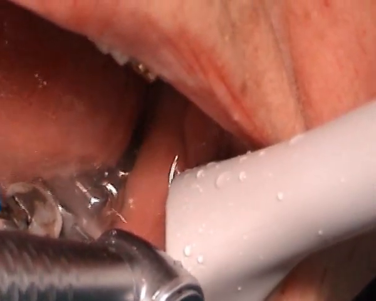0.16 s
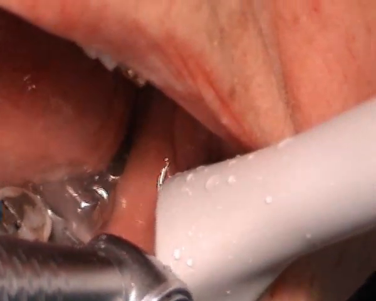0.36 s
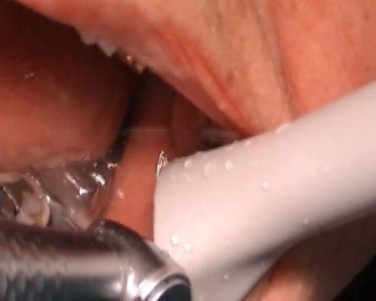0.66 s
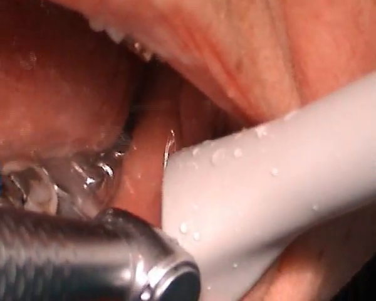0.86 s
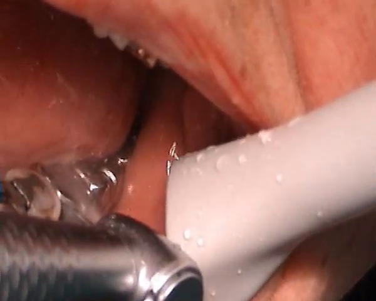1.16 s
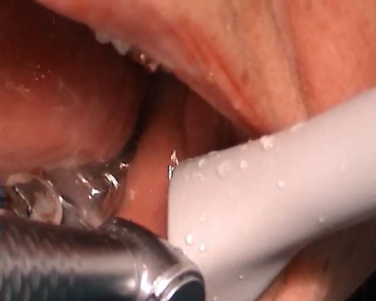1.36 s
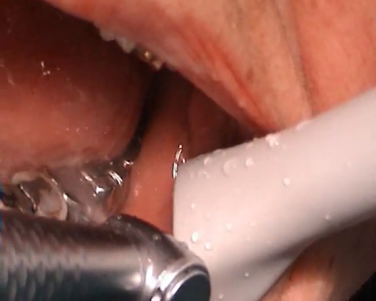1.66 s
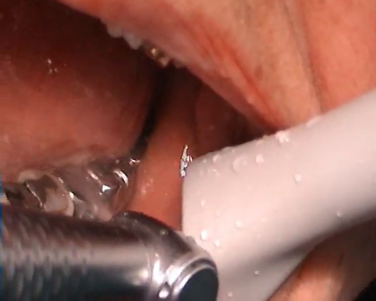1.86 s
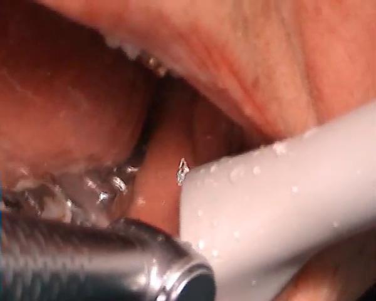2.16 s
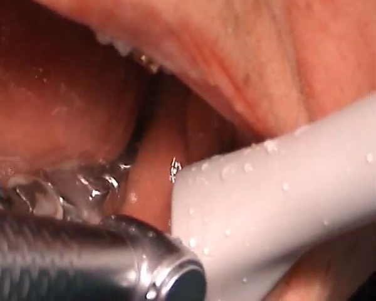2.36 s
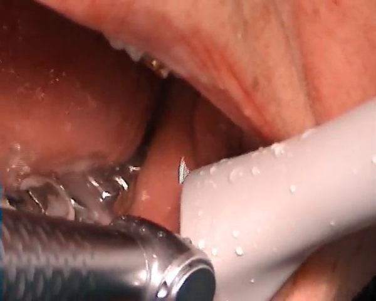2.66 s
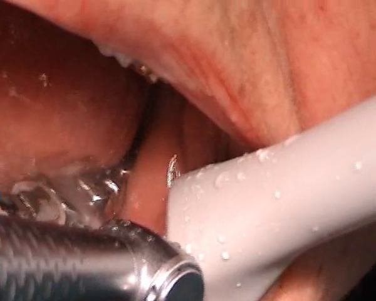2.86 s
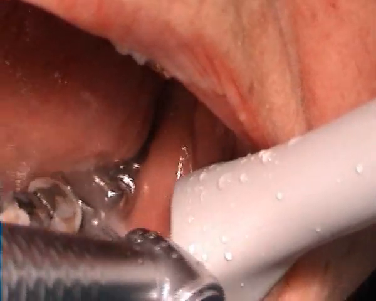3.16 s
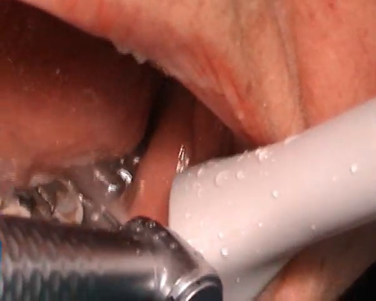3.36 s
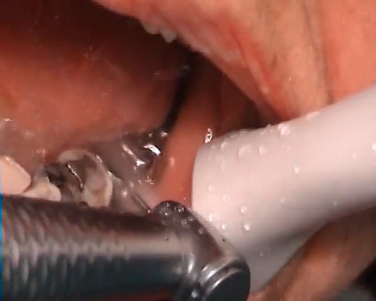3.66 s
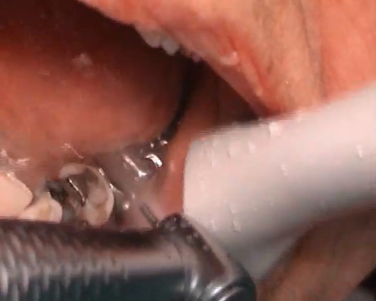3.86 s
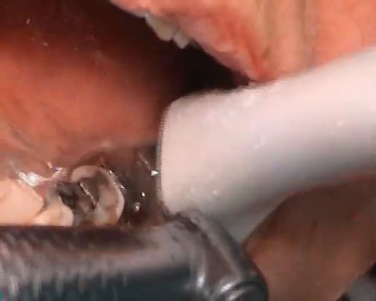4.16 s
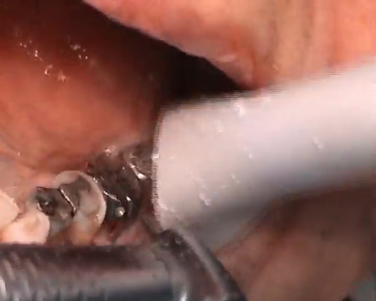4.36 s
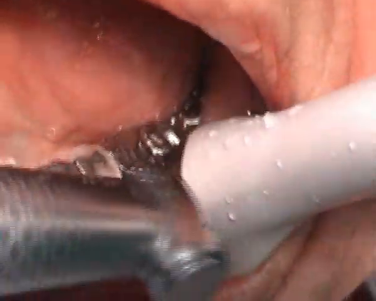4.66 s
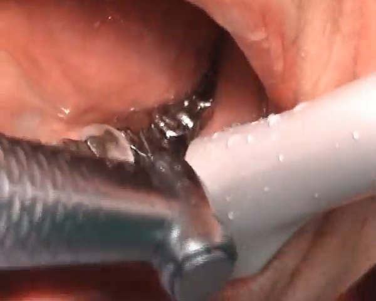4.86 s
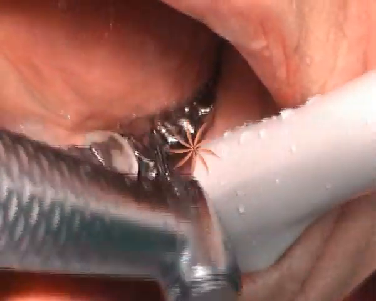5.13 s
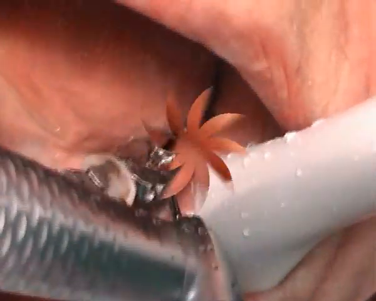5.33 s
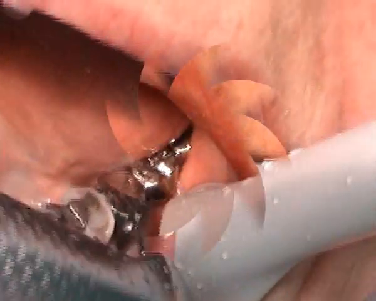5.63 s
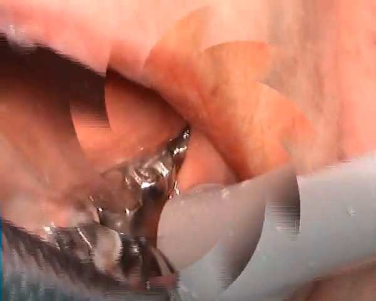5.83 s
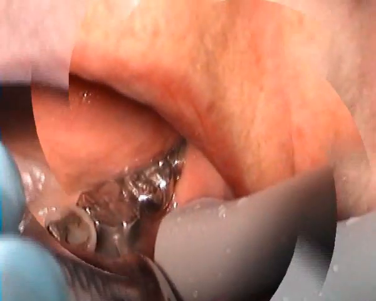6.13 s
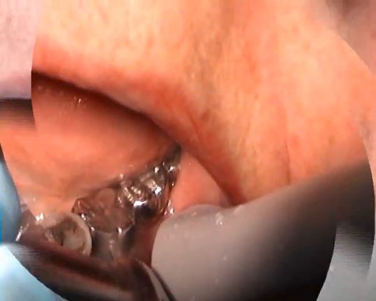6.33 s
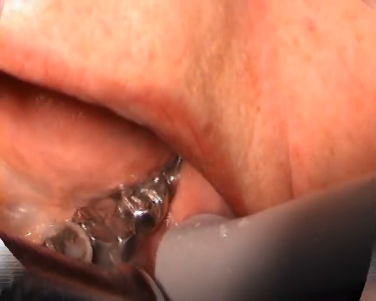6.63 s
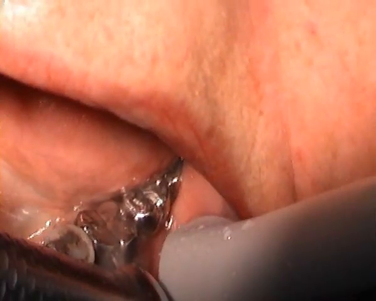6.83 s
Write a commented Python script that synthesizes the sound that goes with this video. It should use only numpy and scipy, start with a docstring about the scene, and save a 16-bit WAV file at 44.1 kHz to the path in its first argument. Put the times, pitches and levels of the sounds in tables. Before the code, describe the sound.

Close inside a mouth, a high dental drill whine rides over wet hiss and hollow suction, slides down and stops; suction fades before drilling returns.

```python
"""A geared dental handpiece cuts a tooth: bur, gear and motor sines on one speed curve, over spray and suction.
The bur lifts off, runs free and brakes, with faint falling squeals; the half-closed suction tip whistles.
The suction goes on alone over a low hum and fades; a second spell of drilling and a breathy whistle swell in.
Air is noise coloured by the resonances of suction tube and mouth; two close microphone ports hear it all."""
import sys
import numpy as np
from scipy import signal
from scipy.fft import rfft, irfft, next_fast_len
from scipy.io import wavfile

SR = 44100
rng = np.random.default_rng(int(sys.argv[2]) if len(sys.argv) > 2 else 0)


def dump(signal):
    """Clip the signal to [-1, 1] and save it as 16-bit WAV at the path in sys.argv[1]."""
    limited = np.clip(np.atleast_2d(signal).T, -1, 1)
    pcm = np.round(limited * 32767).astype(np.int16)
    wavfile.write(sys.argv[1], SR, pcm)


N = 308259
SIZE = next_fast_len(N)
BIN_HZ = np.maximum(np.arange(SIZE // 2 + 1) * SR / SIZE, 1)
TIME_S = np.arange(N) / SR

# Low hum. Each row: time in seconds, level in dB.
HUM_LEVEL = [(4.85, -75), (5.0, -61), (5.16, -53), (5.36, -61), (5.62, -54), (5.9, -58), (6.2, -71),
             (6.4, -80)]
HUM_HZ = 67.5

# Flow of air and water. Each row: time in seconds, tube roar in dB, spray hiss in dB.
AIR_FLOW = [(0, -18.5, -16), (.45, -20.5, -18), (1.6, -20, -17.5), (3.0, -20.5, -17.5), (3.13, -18, -18),
            (3.5, -17, -18), (3.85, -17, -17.5), (3.97, -15, -19.5), (4.06, -17.5, -17.5),
            (4.22, -20, -18.5), (4.265, -17.5, -23.5), (4.33, -16.5, -19), (4.45, -16.5, -21),
            (4.8, -14.5, -18), (5.06, -14.5, -18), (5.57, -21.5, -26.5), (5.75, -23.5, -31.5),
            (6.02, -27, -32), (6.27, -24.5, -26), (6.6, -21, -21.5), (6.99, -17, -17)]
# Borders between the four air ranges, in Hz.
AIR_EDGES_HZ = [700, 5000, 9800]
# Flicker depth of each air range before the drift weights, in dB.
AIR_FLICKER_SCALE_DB = [0.46, 0.48, .8, 1.2]
# Phases: cut, free, draw, fade, again. Each row: handover to the next phase from seconds, to seconds.
HANDOVERS = [(3.0, 3.28), (4.24, 4.32), (4.65, 5.23), (5.8, 6.32)]
# Per phase: low rush against the tube roar, in dB.
RUSH_SHARE_DB = [-24.5, -25, -23, -23.5, -27]
# Per phase: finest mist against the spray hiss, in dB.
MIST_SHARE_DB = [-1.5, -3, -8.5, -8, -1.5]

# Air colour, tube resonances or spray, per phase. Each row: frequency in Hz, relative level in dB.
CUT_TUBE = [(350, -54), (600, -29), (698, -27), (833, -18.5), (1040, -18), (1290, -10.5), (1540, 0),
            (1710, -6), (1940, -16.5), (2230, -20), (2860, -4.5), (3410, -8), (3760, -19.5), (4190, -11.5),
            (5000, -24.5), (6500, -47), (11000, -120)]
CUT_SPRAY = [(2940, -33), (5000, -11.5), (6150, -12.5), (6750, -7), (7750, 0), (8690, -1), (9690, -7.5),
             (10600, -5), (11300, -5.5), (12400, -8.5), (13700, -15.5)]
FREE_TUBE = [(400, -51), (680, -27), (777, -21.5), (1160, -19.5), (1310, -13), (1490, -1.5), (1870, -15),
             (2130, -22.5), (2520, -18), (3080, -8.5), (3410, -9.5), (3860, -24), (4200, -13),
             (4560, -23.5), (5000, -22), (6500, -49), (11000, -120)]
FREE_SPRAY = [(2940, -26), (5000, -6.5), (7880, 0), (9100, -0.5), (10000, -5.5), (12200, -3), (13700, -8.5)]
DRAW_TUBE = [(350, -52), (600, -26.5), (1100, -14.5), (1290, -11), (1360, -3), (1520, -2), (1850, -14),
             (2170, -21.5), (2440, -17.5), (2780, -14), (3570, -9), (3870, -19.5), (4110, -11.5),
             (4500, -19), (5000, -26), (6500, -44), (11000, -120)]
DRAW_SPRAY = [(2940, -34), (5000, -5.5), (5900, -0.5), (6340, -4.5), (8340, -2), (10100, -7.5),
              (11200, -6.5), (13500, -11.5)]
FADE_TUBE = [(350, -51), (600, -21), (710, -24), (769, -15), (1070, -13.5), (1410, 0), (1620, -1),
             (1850, -12.5), (2170, -19), (2660, -10.5), (3270, -3), (3760, -12.5), (4080, -9.5),
             (4420, -15.5), (5000, -17), (6500, -45), (11000, -120)]
FADE_SPRAY = [(2940, -33), (5000, -2), (5580, -2), (6540, -2), (8090, -3), (9980, -14.5), (12000, -10),
              (13600, -17.5)]
AGAIN_TUBE = [(400, -51), (680, -29), (709, -29), (771, -19), (982, -16.5), (1070, -16), (1410, -2),
              (1690, -7.5), (1870, -15), (2080, -23.5), (2440, -15), (3030, -3), (3320, -9), (3960, -10),
              (5000, -14.5), (6500, -43), (11000, -120)]
AGAIN_SPRAY = [(2940, -29), (5000, -11), (5340, -11), (6020, -13.5), (6430, -8.5), (6870, -12), (7190, -5),
               (7520, -3.5), (7870, -8), (8800, -7.5), (9550, -13), (10000, -10), (10600, -7), (11300, -3),
               (13400, -3)]
# Colour of the low rush. Each row: frequency in Hz, relative level in dB.
RUSH = [(19, -42), (33, -12), (49, -17.5), (119, -14), (314, -5), (374, -6.5), (551, -4.5), (682, -5.5),
        (800, -2), (1040, -30), (1760, -120)]
DRAW_RUSH = [(15, -50), (25, -19), (86, -14.5), (211, -6), (360, -6), (468, -6), (503, -6), (800, -4),
             (1040, -31), (1760, -120)]

# Air at the two ports. Each row: frequency in Hz, likeness 0-1, left lead in rad, left minus right in dB.
CUT_PORTS = [(100, 0.43, 0.2, 1.4), (400, 0.54, -0.1, 0.8), (800, 0.83, 0.0, -1.8), (1300, 1.0, 0.0, 0.0),
             (4200, 0.99, 0.0, 0.2), (5200, 0.67, 0.4, 2.7), (6500, 0.75, 0.4, 1.1), (7500, 0.68, 0.8, 2.9),
             (8500, 0.85, 1.9, 1.5), (9700, 0.78, 2.7, 2.9), (10700, 0.62, 2.3, 6.9),
             (12000, 0.37, 1.5, 3.2), (13300, 0.25, 1.6, 2.0)]
FREE_PORTS = [(100, 0.93, 0.0, 0.6), (400, 0.9, -0.3, 0.4), (800, 0.96, 0.0, -1.3), (1300, 0.99, 0.0, 0.2),
              (4200, 0.98, 0.0, 0.3), (5200, 0.77, 0.2, 1.8), (6500, 0.72, 0.5, 2.0),
              (7500, 0.64, 1.1, 3.4), (8500, 0.66, 1.6, 2.0), (9700, 0.87, 2.5, 2.2),
              (10700, 0.31, 2.3, 3.6), (12000, 0.45, 1.0, 2.7), (13300, 0.18, 1.0, 1.5)]
DRAW_PORTS = [(100, 0.94, 0.1, 1.5), (400, 0.95, -0.1, 0.1), (800, 0.96, -0.0, -2.4),
              (1300, 0.99, 0.1, -0.0), (4200, 0.95, 0.1, 0.4), (5200, 0.86, 0.3, 1.7),
              (6500, 0.88, 0.3, 1.7), (7500, 0.8, 0.3, 2.1), (8500, 0.71, 1.0, 2.1), (9700, 0.18, 1.5, 4.8),
              (10700, 0.29, 0.3, 3.5), (12000, 0.69, 0.0, 1.0), (13300, 0.67, 0.1, -0.2)]
AGAIN_PORTS = [(100, 0.92, 0.0, 1.2), (400, 0.89, -0.0, 0.4), (800, 0.96, -0.1, -1.8),
               (1300, 0.96, 0.1, -0.1), (4200, 0.86, 0.5, 1.4), (5200, 0.83, 0.3, 1.4),
               (6500, 0.74, 0.5, 0.9), (7500, 0.83, 0.5, 0.7), (8500, 0.64, 0.7, 1.3),
               (9700, 0.47, 2.3, 4.5), (10700, 0.2, 1.0, 6.4), (12000, 0.45, 1.2, 4.7),
               (13300, 0.39, 0.4, -0.3)]
# Tones at the two ports. Each row: frequency in Hz, likeness 0-1 (unused), left lead in rad,
# left minus right in dB.
CUT_TONE_PORTS = [(600, 1, 0, 0), (5600, 1, 1.3, 5), (8500, 1, 2.1, 1.6), (9600, 1, 2.6, 2),
                  (11200, 1, 2.1, 7.4)]
BRAKE_TONE_PORTS = [(2000, 1, .3, -3.6), (5500, 1, .5, 2), (8500, 1, 1.6, 4), (10000, 1, 1.3, .3),
                    (12000, 1, .4, 2.5), (13000, 1, -.4, -2)]
AGAIN_TONE_PORTS = [(600, 1, 0, 0), (6000, 1, .5, 0), (9100, 1, 2.7, -.5), (12000, 1, 1.6, 5.8)]

# Breathy whistle. Each row: time in seconds, level in dB.
BREATHY_WHISTLE = [(5.9, -58), (6.2, -36), (6.5, -29), (6.75, -31), (6.99, -28)]
BREATHY_HZ, BREATHY_WIDTH_HZ = 7450, 130
# Whistle of the half-closed suction tip. Each row: time in seconds, level in dB.
TIP_WHISTLE = [(4.25, -60), (4.36, -43), (4.5, -30.5), (4.62, -25), (4.75, -61)]
TIP_HZ, TIP_WIDTH_HZ = 3620, 140

# Squeals as the gears coast on. Each row: start in seconds, length in seconds, from Hz, to Hz, level in dB.
COASTING = [(4.31, .06, 8100, 7300, -30), (4.44, .135, 9600, 7300, -32), (4.69, .095, 11000, 7950, -29)]
# Bur speed: sags under load, runs free, brakes, cuts again. Each row: time in seconds, turns per second.
BUR_SPEED = [(0.0, 3038), (.1, 2996), (.2, 2920), (.5, 2855), (1.1, 2812), (1.2, 2839), (1.7, 2785),
             (1.9, 2739), (2.15, 2729), (2.4, 2779), (2.6, 2804), (2.82, 2733), (3.0, 2758), (3.1, 2919),
             (3.2, 3118), (3.35, 3172), (3.7, 3197), (3.905, 3197), (3.94, 3120), (4.125, 2448),
             (4.2, 2027), (4.26, 1745), (5.9, 3147), (6.65, 3150), (6.7, 3118), (6.8, 3020), (6.87, 2984),
             (6.99, 2950)]
# Singing multiples of the bur speed: 0.2 is the motor, the uneven ones are guessed to be gear tones.
# Each key: multiple. Each row: start in seconds, end in seconds, level in dB.
SINGING = {"0.2": [(0, 3.1, -54), (3.2, 3.88, -44), (6.02, 6.68, -52), (6.68, 7.1, -51)],
           "1": [(4.04, 4.17, -37), (4.18, 4.25, -31)], "2": [(0, .3, -30.5), (1.0, 1.45, -34),
           (1.45, 1.74, -27), (2.3, 2.85, -32.5), (2.93, 3.04, -30), (3.58, 3.9, -36), (6.7, 6.77, -29),
           (6.77, 6.83, -25), (6.83, 7.0, -29)], "3": [(.17, .62, -18), (.65, 1.2, -25), (1.25, 1.53, -20),
           (1.68, 2.15, -23), (2.17, 2.74, -19), (2.78, 3.0, -31), (3.0, 3.08, -24), (3.15, 3.9, -25),
           (3.9, 4.01, -28), (4.215, 4.25, -27), (6.74, 6.88, -23), (6.88, 7.0, -30)],
           "3.175": [(.2, 3.08, -22)], "3.755": [(3.2, 4.0, -32)], "4": [(.15, .68, -28), (1.0, 1.25, -32),
           (1.27, 1.8, -24.5), (1.85, 2.3, -23), (2.3, 2.75, -25.5), (2.75, 3.0, -28), (3.0, 3.08, -24),
           (4.125, 4.245, -25), (6.68, 6.79, -32), (6.79, 6.87, -27), (6.87, 7.0, -26)],
           "4.56": [(4.17, 4.245, -29)], "5": [(4.1, 4.255, -28)], "6": [(4.17, 4.19, -24),
           (4.19, 4.235, -16.5)], "7": [(4.215, 4.25, -28)]}
SPEED_WAVER = .001   # share of the speed
BRAKE_S, SECOND_SPELL_S = 3.85, 5.5
CUT_EDGE_S, BRAKE_EDGE_S, AGAIN_EDGE_S = .081, .016, .03
CUT_WAVER_DB, BRAKE_WAVER_DB, AGAIN_WAVER_DB, HUM_WAVER_DB = 2.4, 1.5, 1.7, 1.5

CUTOFF_HZ = 13790


def from_db(db):
    """Decibels to gain."""
    return 10 ** (np.asarray(db) / 20)


def rms_one(x):
    """Scale to unit rms."""
    return x / np.sqrt(np.mean(x ** 2) + 1e-20)


def in_time(rows):
    """Columns of a curve at every sample."""
    s, *columns = np.transpose(rows)
    return [np.interp(TIME_S, s, column) for column in columns]


def at_hz(points):
    """Columns of a frequency table at every bin, interpolated over log frequency."""
    hz, *columns = np.transpose(points)
    return [np.interp(np.log(BIN_HZ), np.log(hz), column) for column in columns]


def drift(pole_hz):
    """Slow chance of unit spread: coarse noise through a double one-pole low-pass."""
    step = 40   # samples per coarse point
    warmup = 2000
    pole = np.exp(-2 * np.pi * pole_hz * step / SR)
    noise = rng.standard_normal(N // step + warmup + 2)
    slow = signal.lfilter([1], [1, -2 * pole, pole ** 2], noise)[warmup:]
    return np.interp(np.arange(N) / step, np.arange(len(slow)), rms_one(slow))


def at_ports(shared, ports, own=None):
    """Left and right spectra: a shared part, led and tilted to one side, plus any own part of each port."""
    likeness, lead_rad, tilt_db = at_hz(ports)
    left_gain = from_db(tilt_db / 2) * np.exp(.5j * lead_rad)
    left, right = shared, shared
    if own is not None:
        likeness = np.clip(likeness, 0, 1)
        left, right = [np.sqrt(likeness) * shared + np.sqrt(1 - likeness) * part for part in own]
    return np.array([left * left_gain, right / left_gain])


def to_sound(spectra):
    """Spectra to N samples."""
    return irfft(spectra, SIZE)[:, :N]


def sine(hz, gain, waver_db):
    """A sine on a pitch curve, wavering in level; rms follows the gain."""
    phase = 2 * np.pi * np.cumsum(hz) / SR + rng.uniform(0, 2 * np.pi)
    heard = gain > 0
    waver = from_db(waver_db * drift(21)[heard])
    out = np.zeros(N)
    out[heard] = np.sqrt(2) * gain[heard] * waver * np.sin(phase[heard])
    return out


def spell(start_s, end_s, edge_s):
    """One inside a spell, with linear fades centred on its ends."""
    half = min(max(edge_s, .002), end_s - start_s) / 2
    corners = [start_s - half, start_s + half, end_s - half, end_s + half]
    return np.interp(TIME_S, corners, [0, 1, 1, 0])


def hum():
    """A low steady-pitched sine that swells and dips."""
    tone = sine(np.full(N, HUM_HZ), from_db(in_time(HUM_LEVEL)[0]), HUM_WAVER_DB)
    return to_sound(at_ports(rfft(tone, SIZE), AGAIN_TONE_PORTS))


def air_ranges():
    """Turbulent noise in four ranges, each phase in its own colour: rush, tube roar, spray, mist."""
    phases = [(CUT_TUBE, CUT_SPRAY, CUT_PORTS), (FREE_TUBE, FREE_SPRAY, FREE_PORTS),
              (DRAW_TUBE, DRAW_SPRAY, DRAW_PORTS), (FADE_TUBE, FADE_SPRAY, DRAW_PORTS),
              (AGAIN_TUBE, AGAIN_SPRAY, AGAIN_PORTS)]
    begun = [np.ones(N)] + [np.interp(TIME_S, span, [0, 1]) for span in HANDOVERS] + [np.zeros(N)]
    below = [0] + [1 / (1 + (BIN_HZ / edge) ** 16) for edge in AIR_EDGES_HZ] + [1]   # power shares
    ranges = np.zeros((4, 2, N))
    for k, (tube, spray, ports) in enumerate(phases):
        # the drawing tip gulps nearer the water: more bass
        rush = DRAW_RUSH if ports is DRAW_PORTS else RUSH
        white = rfft(rng.standard_normal((3, SIZE)))
        noise = at_ports(white[0], ports, white[1:])
        # powers add in a handover
        presence = np.sqrt(np.maximum(begun[k] - begun[k + 1], 0))
        shares_db = (RUSH_SHARE_DB[k], 0, 0, MIST_SHARE_DB[k])
        for j, points in enumerate((rush, tube, spray, spray)):
            window = np.sqrt(np.maximum(below[j + 1] - below[j], 0))
            band = to_sound(noise * from_db(at_hz(points)[0]) * window)
            ranges[j] += from_db(shares_db[j]) * presence * rms_one(band)
    return ranges


def air():
    """Flow drives the noise: the two low ranges follow the tube, the two high ones the spray."""
    tube_db, spray_db = in_time(AIR_FLOW)
    flows_db = (tube_db, tube_db, spray_db, spray_db)
    # droplets splutter through all ranges together, deepest at the top
    splutter = drift(18.6)
    out = 0
    for flow_db, scale_db, band in zip(flows_db, AIR_FLICKER_SCALE_DB, air_ranges()):
        flicker_db = scale_db * (.32 * splutter + 1.13 * drift(27))
        out = out + from_db(flow_db + flicker_db) * band
    return out


def whistle(rows, hz, width_hz, ports):
    """Air across a narrow gap: noise twice through one resonance."""
    peak = 1 / (1 + ((BIN_HZ - hz) / (width_hz / 2)) ** 2)
    noise = at_ports(peak * rfft(rng.standard_normal(SIZE)), ports)
    return from_db(in_time(rows)[0]) * rms_one(to_sound(noise))


def coasting_gears():
    """Gears coasting on: short sines gliding down."""
    out = np.zeros(N)
    for start_s, length_s, from_hz, to_hz, db in COASTING:
        end_s = start_s + length_s
        glide_hz = np.interp(TIME_S, [start_s, end_s], [from_hz, to_hz])
        gain = from_db(db) * spell(start_s, end_s, length_s / 2)
        out += sine(glide_hz, gain, BRAKE_WAVER_DB)
    return out


def bur(speed, from_s, to_s, edge_s, waver_db):
    """Each multiple of the bur speed is one sine, heard in the spells that start in this stretch."""
    out = np.zeros(N)
    for multiple, rows in SINGING.items():
        powers = [from_db(2 * db) * spell(start_s, end_s, edge_s)
                  for start_s, end_s, db in rows if from_s <= start_s < to_s]
        if powers:
            out += sine(float(multiple) * speed, np.sqrt(sum(powers)), waver_db)
    return out


def handpiece():
    """Bur, gear and motor turn together: tones on one wavering speed, placed at the ports."""
    speed = in_time(BUR_SPEED)[0] * (1 + SPEED_WAVER * drift(10))
    cut = bur(speed, -np.inf, BRAKE_S, CUT_EDGE_S, CUT_WAVER_DB)
    brake = bur(speed, BRAKE_S, SECOND_SPELL_S, BRAKE_EDGE_S, BRAKE_WAVER_DB) + coasting_gears()
    again = bur(speed, SECOND_SPELL_S, np.inf, AGAIN_EDGE_S, AGAIN_WAVER_DB)
    placed = [(cut, CUT_TONE_PORTS), (brake, BRAKE_TONE_PORTS), (again, AGAIN_TONE_PORTS)]
    return to_sound(sum(at_ports(rfft(tones, SIZE), ports) for tones, ports in placed))


def scene():
    """Hum, air and whistles under the handpiece tones."""
    tip = whistle(TIP_WHISTLE, TIP_HZ, TIP_WIDTH_HZ, DRAW_PORTS)
    breathy = whistle(BREATHY_WHISTLE, BREATHY_HZ, BREATHY_WIDTH_HZ, AGAIN_PORTS)
    return hum() + air() + tip + breathy + handpiece()


def record(dry):
    """Peaks beyond 0.9 clip, then a steep low-pass cuts the top."""
    low_pass = signal.ellip(12, .5, 71, CUTOFF_HZ, fs=SR, output="sos")
    return signal.sosfilt(low_pass, np.clip(dry, -.9, .9))


dry = scene()
out = record(dry)
dump(out)
```